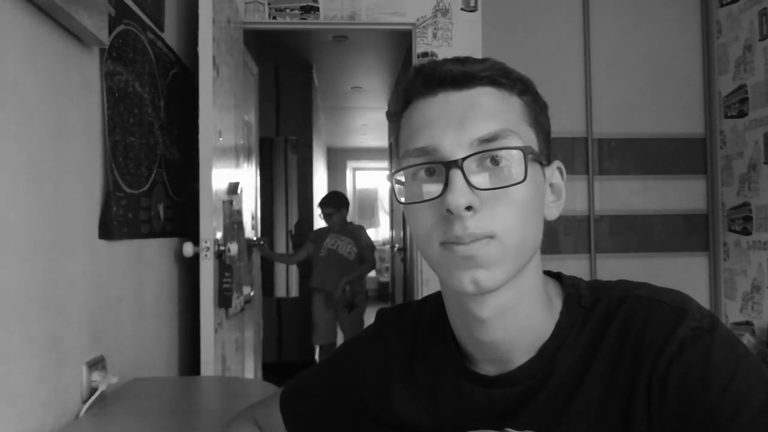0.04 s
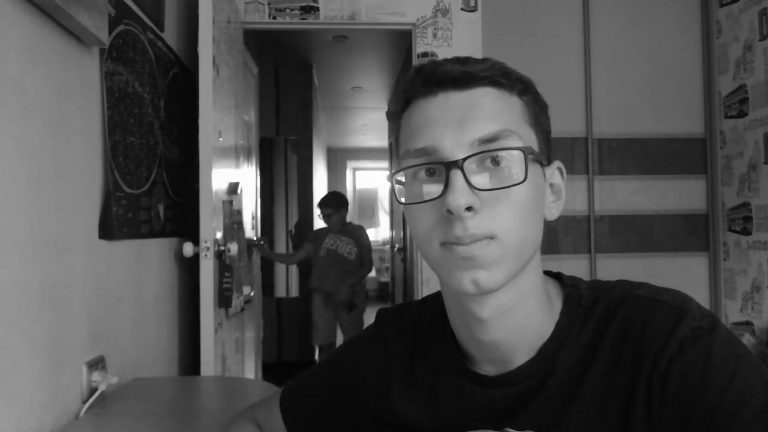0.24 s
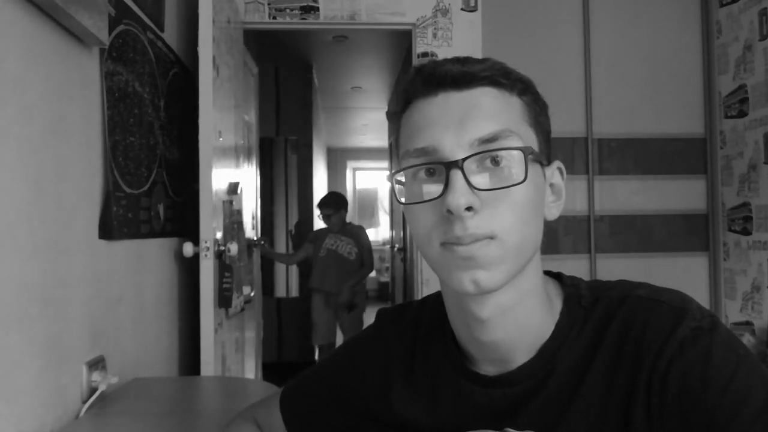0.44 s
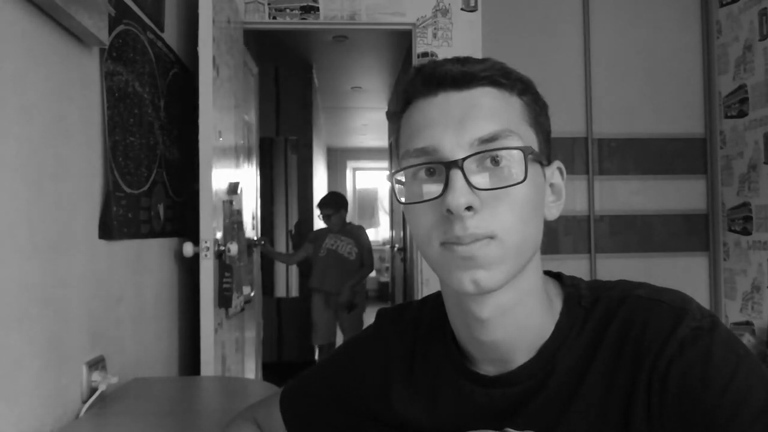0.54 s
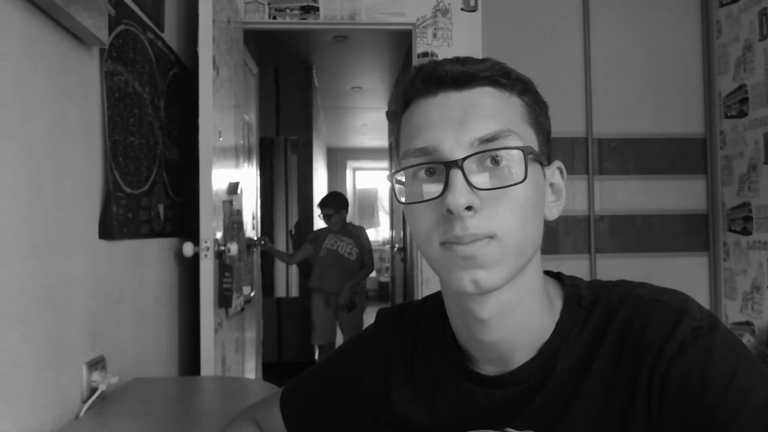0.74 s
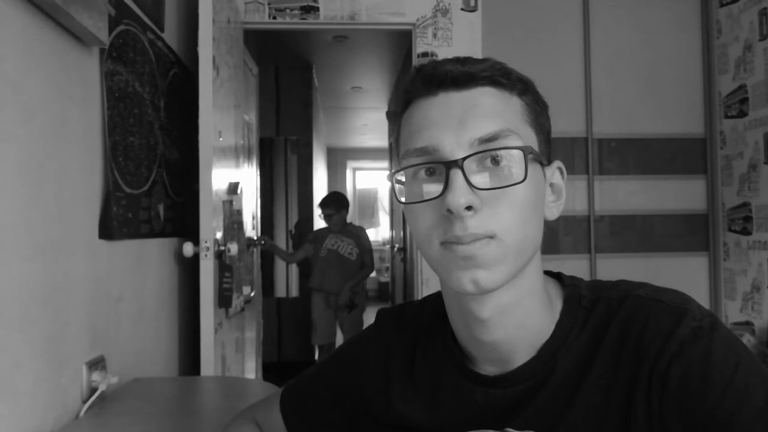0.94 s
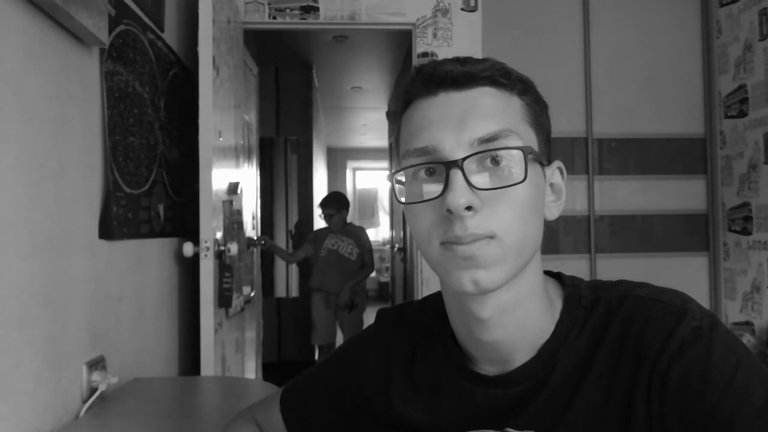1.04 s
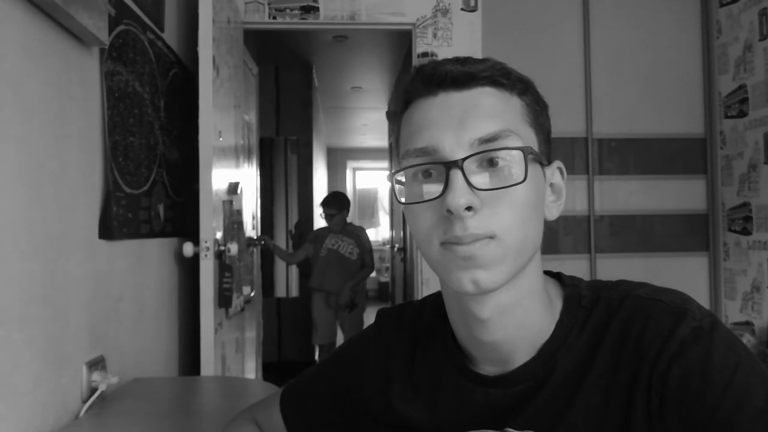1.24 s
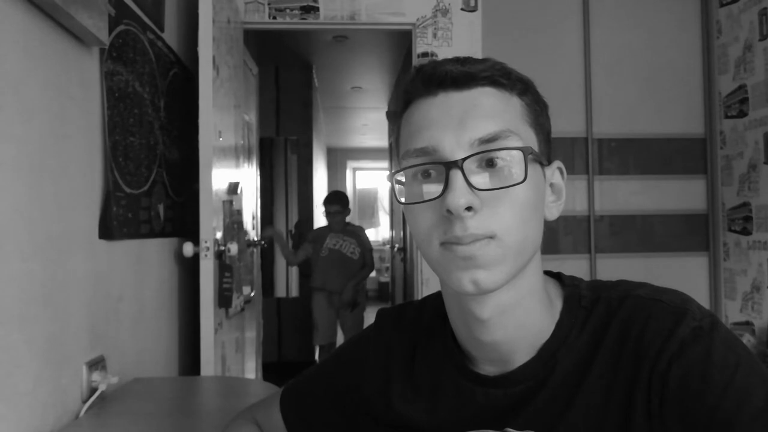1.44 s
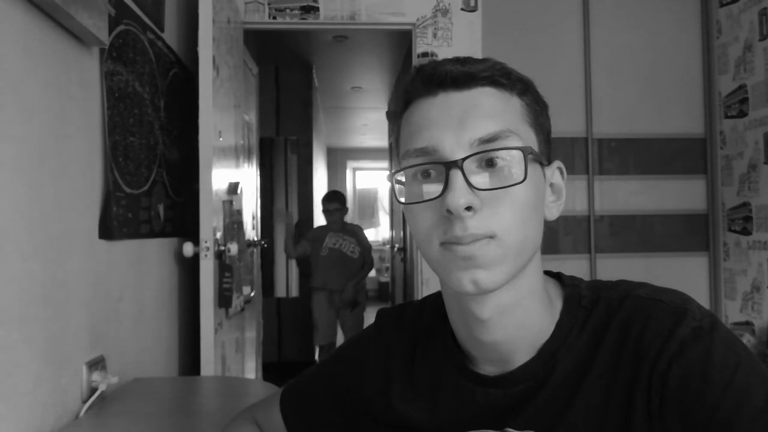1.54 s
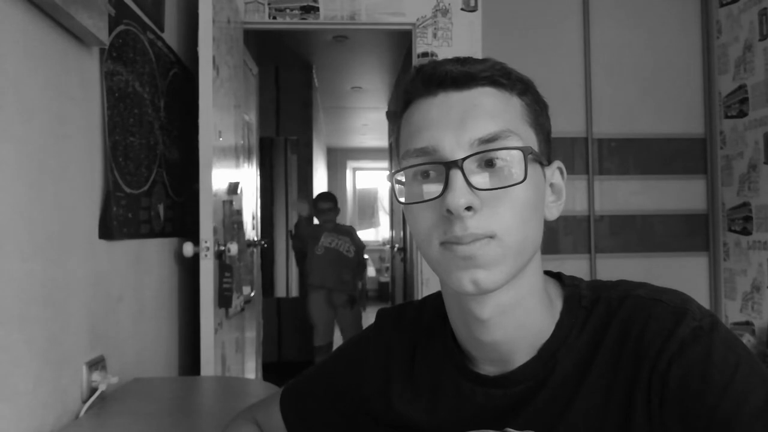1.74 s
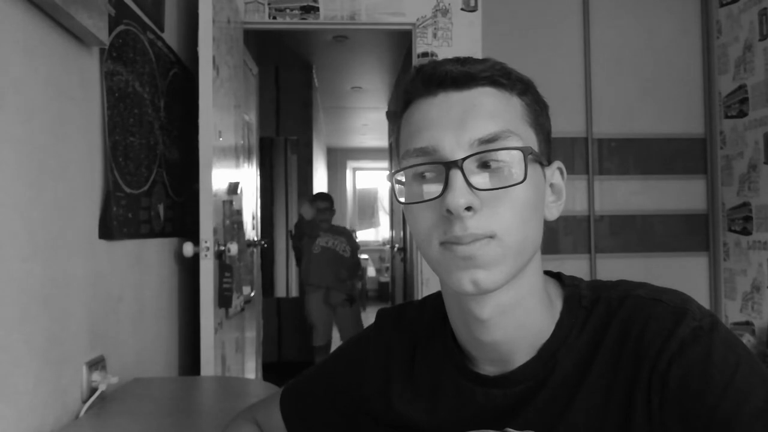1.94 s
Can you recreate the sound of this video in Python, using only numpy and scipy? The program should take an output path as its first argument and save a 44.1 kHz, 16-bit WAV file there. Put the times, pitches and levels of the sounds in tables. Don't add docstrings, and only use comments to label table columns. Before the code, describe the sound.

An inner door closes in a house. A high, scratchy hinge squeal is already under way at 0 seconds, climbing slightly until about 0.2, when the door thuds into its frame with a sharp crack, quick rattle and low boom, fading by about 0.5. Faint scuffs and taps follow until about 1.9, over steady mains hum, faint fan whine and room air. The laptop microphone hears it at a distance, with short hallway echo.

```python
import sys
import numpy as np
from scipy import signal
from scipy.fft import rfft, irfft
from scipy.io import wavfile
from scipy.ndimage import uniform_filter1d

SR = 44100
rng = np.random.default_rng(int(sys.argv[2]) if len(sys.argv) > 2 else 0)


def transcribe(u):
    v = np.clip(np.atleast_2d(u).T, -1, 1)
    q = np.round(v * 32767).astype(np.int16)
    wavfile.write(sys.argv[1], SR, q)


def decibels_to_gain(level_db):
    exponent = np.asarray(level_db, float) / 20
    return 10 ** exponent


N = 88200
LEAD = 8820
M = N + LEAD
T = (np.arange(M) - LEAD) / SR


def level(x, db):
    return x * decibels_to_gain(db) / np.sqrt(np.mean(x ** 2))


def colour(x, table):
    hz, db = np.array(table, float).T
    f = np.fft.rfftfreq(len(x), 1 / SR) + 1
    gain_db = np.interp(np.log(f), np.log(hz), db)
    return irfft(rfft(x) * decibels_to_gain(gain_db), len(x))


def band(hz, width_hz):
    b, a = signal.iirpeak(hz, hz / (1.474 * width_hz), fs=SR)
    once = signal.lfilter(b, a, rng.standard_normal(M))
    return level(signal.lfilter(b, a, once), 0)


def walk(rate):
    k = int(SR / rate)
    steps = np.repeat(rng.standard_normal(M // k + 1), k)
    smooth = uniform_filter1d(uniform_filter1d(steps, k), k)
    return level(smooth[:M], 0)


def ring(modes, t):
    t = np.maximum(t, 0)
    return sum(decibels_to_gain(db - 60 * t / t60) * np.sin(2 * np.pi * hz * t) for hz, db, t60 in modes)


def hall(x):
    # (frequency [Hz], T60 [s])
    hall_decay = [(60, 0.7), (250, 0.28), (1000, 0.2), (3000, 0.34), (7000, 0.32)]
    t, tail = np.arange(SR) / SR, 0
    hz, t60 = np.array(hall_decay).T
    for f in 45 * 2. ** np.arange(8):
        decay_s = np.interp(np.log(f), np.log(hz), t60)
        part = band(f, f)[:SR] * decibels_to_gain(-60 * t / decay_s) * np.sqrt(f)
        tail = tail + part * np.minimum(t / 0.0034, 1)
    return signal.fftconvolve(x, tail / np.sqrt(np.sum(tail ** 2)))[:M]


def room_air():
    # (frequency [Hz], spectral density [dB per Hz])
    air_colour = [(20, -1.5), (31, -8.5), (50, -12), (90, -10), (300, -13), (500, -17.5), (1300, -26),
                  (3200, -32), (4100, -42.5), (5500, -31.5), (7300, -42)]
    duck_s, duck_db, recover_s = 0, -4.5, 0.6
    duck = duck_db * np.exp(-(np.maximum(T - duck_s, 0) / recover_s) ** 2)
    air = level(colour(rng.standard_normal(M), air_colour), -63)
    return air * decibels_to_gain(0.31 * walk(12) + duck)


def wavering_hum():
    # (frequency [Hz], width [Hz], level [dB])
    hum_bands = [(125, 9.1, -71.5), (167.2, 14, -70), (243.1, 17, -70.5), (57.7, 55, -75.5)]
    return sum(band(hz, w) * decibels_to_gain(db) for hz, w, db in hum_bands)


def fan_whine():
    # (frequency [Hz], level [dB])
    whine_lines = [(47.5, -68.5), (60, -63), (505, -82.5), (757, -83), (1008, -82.5), (2017, -89.5)]
    return sum(np.sqrt(2) * decibels_to_gain(db + 0.4 * walk(8)) * np.sin(2 * np.pi * hz * T)
               for hz, db in whine_lines)


def loaded_mains():
    # (time [s], level [dB])
    hum_load = [(0.0, -66), (0.17, -68.5), (0.22, -56.5), (0.29, -38), (0.36, -61), (0.65, -64),
                (0.67, -69), (0.83, -61), (1.16, -61.5), (1.22, -71.5), (1.44, -56), (1.5, -61.5),
                (1.98, -59.5), (2.0, -66)]
    hum_hz, wander_hz, trim_db, ceiling_db = 121.7, 1.37, 0.07, -56
    s, db = np.array(hum_load).T
    load_db = np.minimum(np.interp(T, s, db), ceiling_db) + trim_db
    phase = 2 * np.pi * np.cumsum(hum_hz + wander_hz * walk(6)) / SR
    return np.sqrt(2) * decibels_to_gain(load_db) * np.sin(phase)


def house():
    return wavering_hum() + fan_whine() + loaded_mains() + room_air()


def air_sway():
    # (frequency [Hz], level [dB], T60 [s])
    sway_modes = [(10.76, -29.5, 2.29), (28, -47.5, 0.23)]
    start_s, rise_s = 0.195, 0.1
    return ring(sway_modes, T - start_s) * np.clip((T - start_s) / rise_s, 0, 1)


def scuffs():
    scuff_starts = [.45, .74, .59, .672, .676, .678, .925, .935, .94, 1.235, 1.242, 1.41, 1.239, 1.24,
                    1.239, 1.404, 1.805, 1.6, .213, .219, .229, .219, .43, .2245, .214, .225]
    # (length [s], level [dB], centre [Hz], width [Hz])
    scuff_shapes = [(.2, -50.5, 36, 13), (0.17, -57.5, 23.5, 47), (0.18, -70, 240, 45),
                    (0.051, -63, 880, 380), (.075, -67.5, 1830, 790), (0.061, -71, 2560, 570),
                    (0.046, -60.5, 676, 69), (0.054, -74, 6400, 1700), (0.055, -76.5, 4370, 400),
                    (0.053, -62, 5870, 1900), (0.11, -69, 5900, 500), (0.17, -80, 4900, 1800),
                    (0.06, -61, 1040, 290), (0.049, -61, 680, 370), (.047, -69, 3100, 1100),
                    (0.059, -61.5, 135, 22), (0.045, -70, 5600, 4200), (0.09, -62.5, 263, 20),
                    (0.21, -49, 237, 72), (.15, -57.5, 2350, 500), (0.0058, -42.5, 5500, 610),
                    (.012, -49.5, 1100, 430), (0.4, -58, 60, 43), (.004, -33.5, 2020, 2200),
                    (0.016, -43.5, 597, 130), (0.16, -47.5, 200, 220)]
    out = 0
    for s, (length, db, hz, width_hz) in zip(scuff_starts, scuff_shapes):
        attack = np.clip((T - s) / (0.11 * length), 0, 1)
        fall = np.cos(np.pi * np.clip((T - s) / length, 0, 1) / 2)
        out = out + band(hz, width_hz) * decibels_to_gain(db) * attack * fall
    return out


def boom():
    # (start [s], length [s], peak [dB], frequency [Hz])
    flexing = [
        (.222, .115, -26, 64),
        (.325, .085, -29, 64),
        (.425, .07, -45, 62),
        (.51, .1, -51, 55),
        (.213, .055, -27, 155),
        (.27, .05, -33, 148),
        (.32, .115, -36, 146),
               (0.2046, 0.057, -35, 300), (.28, 0.092, -54, 295), (0.29, 0.044, -58.5, 290),
                    (.208, 0.038, -36, 394), (.255, 0.11, -53, 400), (0.23, 0.036, -30.5, 78),
                    (.265, 0.063, -34, 105), (0.42, 0.081, -51, 80), (0.388, 0.16, -63, 150),
                    (.21, 0.063, -36.5, 200), (0.29, 0.031, -52, 200), (0.219, 0.1, -46, 60),
                    (0.67, 0.14, -56, 48), (0.706, 0.08, -59, 70)]
    out = 0
    for s, length, db, hz in flexing:
        swell = np.sin(np.pi * np.clip((T - s) / length, 0, 1)) ** 1.75
        out = out + decibels_to_gain(db) * swell * np.sin(2 * np.pi * hz * T)
    return out


def seat():
    seated_s, t60_s = 0.42, 0.11
    return decibels_to_gain(-60 * np.maximum(T - seated_s, 0) / t60_s)


def thud():
    # (time [s], level [dB], contact [ms], crack level [dB])
    blows = [
        (.212, -30, 2.8, -81),
        (0.2184, -30.5, 1.04, -34.5),
        (0.225, -31.5, 0.6, -39),
        (.232, -30.5, 1.87, -39),
        (.246, -34, 2.8, -46),
        (0.257, -35.5, 3.4, -53),
        (0.288, -31.5, 3.76, -55),
        (0.349, -44.5, 3.7, -61.5),
    ]
    # (frequency [Hz], level [dB], T60 [s])
    leaf_modes = [(40, -3, 0.82), (94.9, -3, 0.34), (171.3, -16.5, 0.4), (227, -8, 0.21), (308, -7, 0.13),
                  (367.4, -19, 0.35), (391, -12, 0.12), (537, -17.5, 0.21), (634, -21, 0.048),
                  (705, -12, 0.045), (844, -23, 0.29), (998, -12.5, 0.074), (1517, -15.5, 0.036),
                  (2240, -22, 0.065)]
    # (frequency [Hz], spectral density [dB per Hz])
    crack_colour = [(180, -18), (300, -3.5), (604, -12.5), (904, -15), (1590, -22.5), (2350, -25),
                    (3860, -24), (5860, -25.5), (7470, -35.5), (9710, -82), (16400, -120)]
    crack_t60_s = 0.021
    push, crack = np.zeros(M), np.zeros(M)
    grit = level(colour(rng.standard_normal(M), crack_colour), 0)
    for s, db, ms, crack_db in blows:
        contact_s = ms / 1000
        u = np.clip((T - s) / contact_s, 0, 1)
        push += decibels_to_gain(db) * np.sin(np.pi * u) ** 2 / (contact_s * SR / 2)
        crack += (T > s) * decibels_to_gain(crack_db - 60 * np.maximum(T - s, 0) / crack_t60_s)
    leaf = signal.fftconvolve(push, ring(leaf_modes, np.arange(SR) / SR))[:M]
    return leaf, grit * crack


def slip(slip_hz, tilt_db):
    # (multiple, level [dB])
    overtones = [(1, -4), (2, 0), (3, -3.5), (4, -3.5), (5, -2.6), (6, -9)]
    # (frequency [Hz], width [Hz], lift [dB])
    plate_modes = [(1211, 6.7, 8.5), (2270, 85, 3), (3470, 86, 5.5), (4320, 63, 9.5), (4704, 35, 8.5),
                   (5390, 140, 5.5), (5903, 30, 3), (5830, 85, 3)]
    flutter_db = 1.15
    phase = 2 * np.pi * np.cumsum(slip_hz) / SR
    out = 0
    for k, db in overtones:
        lift_db = sum(lift / (1 + ((k * slip_hz - c) / w) ** 2) for c, w, lift in plate_modes)
        tone_db = db - 4 + tilt_db * (k - 2) + lift_db + flutter_db * walk(108.9)
        out = out + decibels_to_gain(tone_db) * np.sin(k * phase + rng.uniform(0, 2 * np.pi))
    return out


def gate(start_s, end_s):
    return np.clip((T - start_s) / 0.004, 0, 1) * np.clip((end_s - T) / 0.004, 0, 1)


def scrape():
    rubbing = band(974, 350) * 0.6 + band(5300, 1500) + band(2200, 1600) + band(3130, 670) + band(6800, 2300)
    scrape_db, t60_s = -58, 0.5
    return rubbing * decibels_to_gain(scrape_db - 60 * np.maximum(T, 0) / t60_s)


def hinge():
    # (time [s], frequency [Hz])
    slip_rate = [
        (0, 1068),
        (.02, 1078),
        (.026, 1132),
        (.055, 1158),
        (.078, 1181),
        (.138, 1186),
        (.148, 1206),
        (.21, 1216),
        (.222, 1195),
    ]
    # (level [dB], brightness [dB per overtone])
    effort = [(-48, -0.5), (-51.5, 3.5), (-46.5, 0.5), (-49, 0.1), (-48.5, 2), (-47, 0.8), (-45.5, 1.5),
              (-49, 0), (-47.5, 3)]
    # (start [s], end [s], first rate [Hz], last rate [Hz])
    groan_glide = (-.16, -.006, 860, 930)
    (s, hz), (db, tilt) = np.array(slip_rate).T, np.array(effort).T
    squeal_jitter, groan_jitter = 0.003, 0.09
    squeal_db, groan_db = -2.5, -44
    squeal = slip(np.interp(T, s, hz) * (1 + squeal_jitter * walk(149.9)), np.interp(T, s, tilt))
    squeal = squeal * decibels_to_gain(np.interp(T, s, db) + squeal_db) * gate(-0.019, s[-1])
    a, b, first_hz, last_hz = groan_glide
    groan_hz = np.interp(T, [a, b], [first_hz, last_hz])
    groan = slip(groan_hz * (1 + groan_jitter * walk(200)), 0.23)
    return squeal + groan * decibels_to_gain(groan_db) * gate(a, b) + scrape()


def scene():
    # (frequency [Hz], gain [dB])
    mic_response = [(20, -1.45), (3200, -2.22), (4000, -5.5), (4700, -0.25), (20000, -2)]
    squeal, (leaf, crack), small = hinge(), thud(), scuffs()
    leaf = leaf * seat()
    near = squeal + leaf + boom() + crack + small
    far = hall(squeal * decibels_to_gain(-4.5) + crack * decibels_to_gain(3.5) + leaf * decibels_to_gain(-10) + small * decibels_to_gain(-4.5))
    return (colour(near + far, mic_response) + air_sway() + house())[None, LEAD:]


def band_limit(x):
    return signal.sosfilt(signal.butter(12, 15570, fs=SR, output="sos"), x)


def record(dry):
    hiss_db, dither_db, top_hz = -81, -96, 8315
    x = dry + decibels_to_gain(hiss_db) * rng.standard_normal(dry.shape)
    x = signal.sosfilt(signal.cheby2(14, 70, top_hz, fs=SR, output="sos"), x)
    x = x + decibels_to_gain(dither_db) * rng.standard_normal(dry.shape)
    return band_limit(x)


dry = scene()
out = record(dry)
transcribe(out)
```